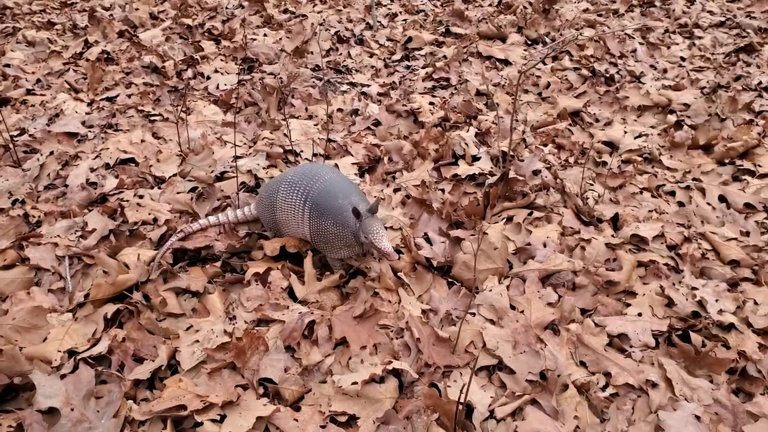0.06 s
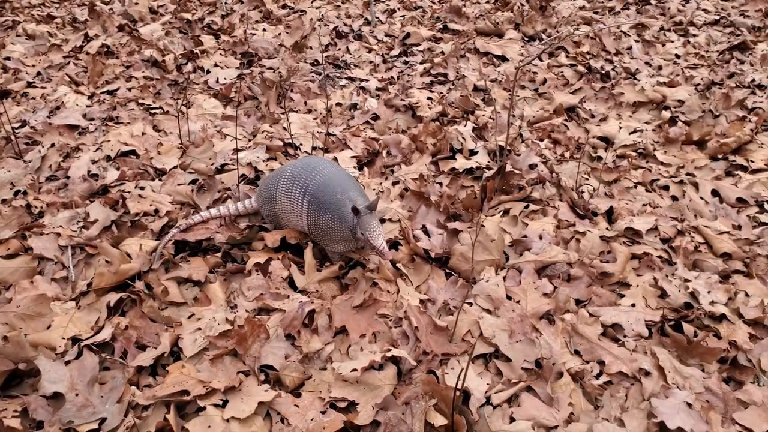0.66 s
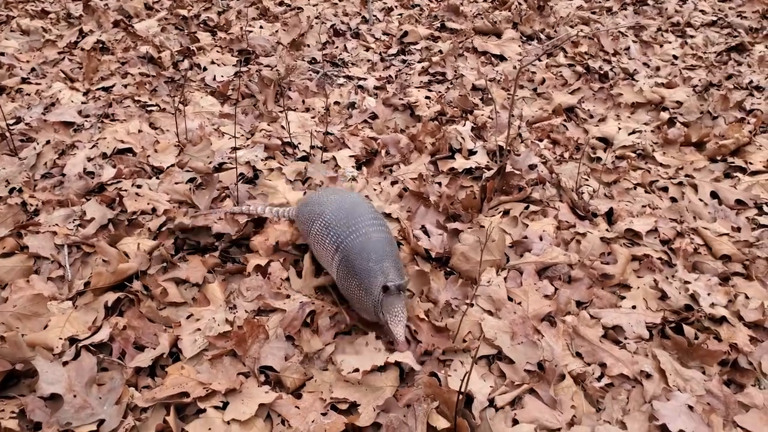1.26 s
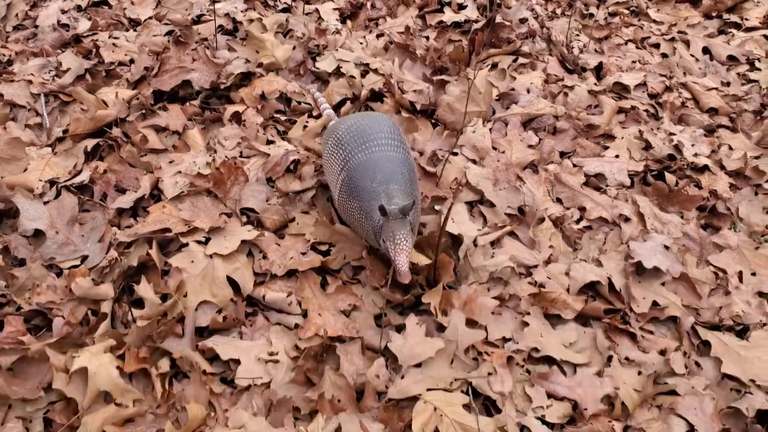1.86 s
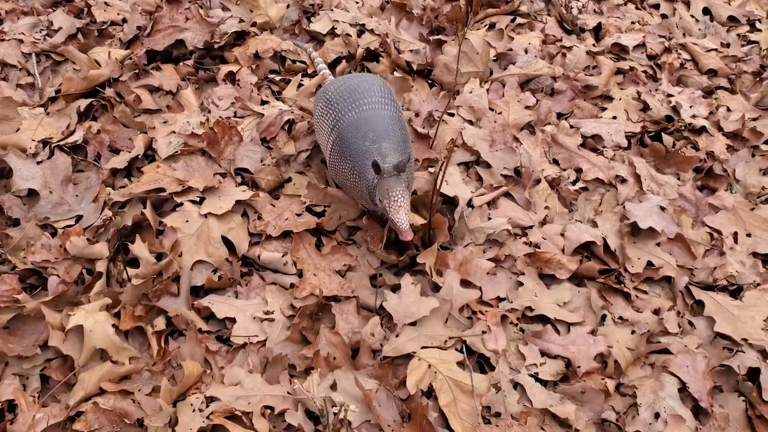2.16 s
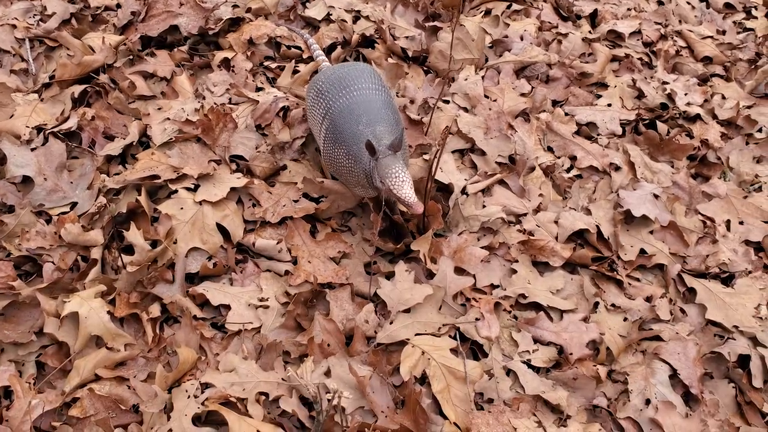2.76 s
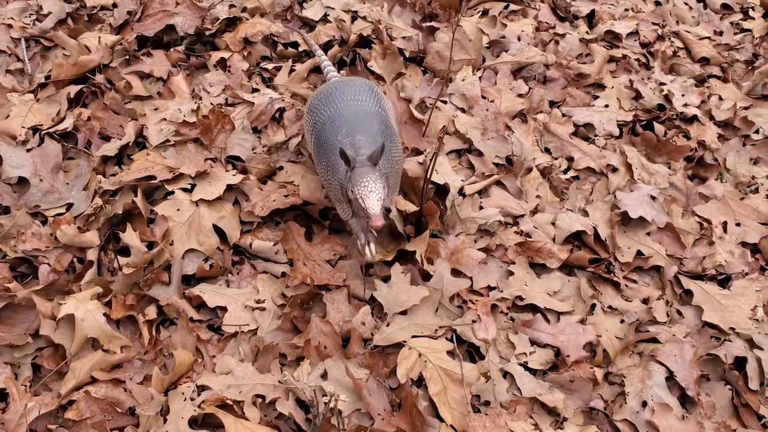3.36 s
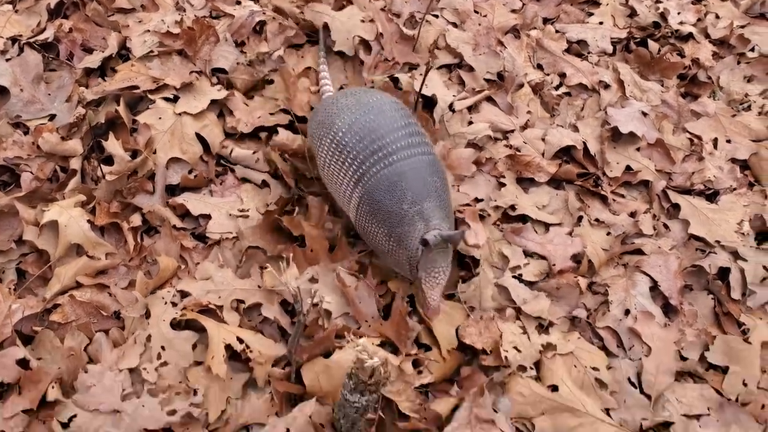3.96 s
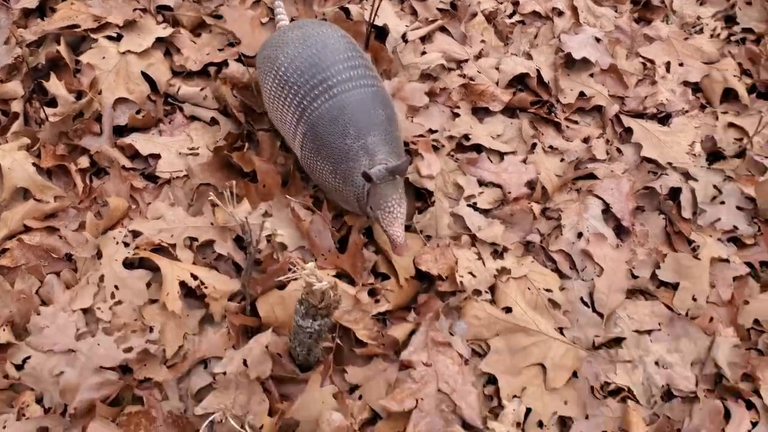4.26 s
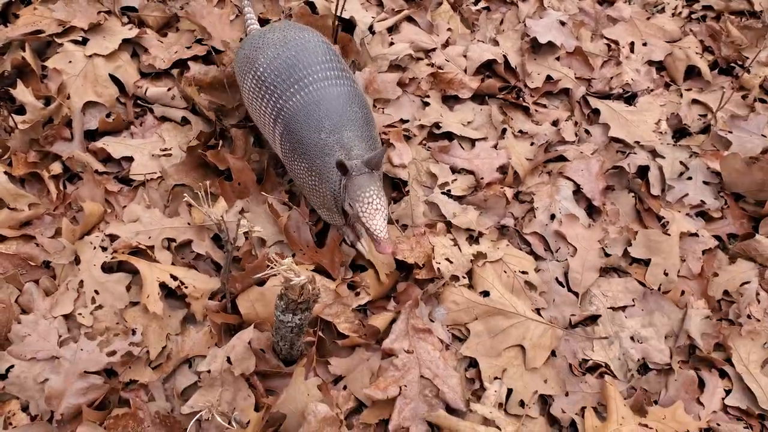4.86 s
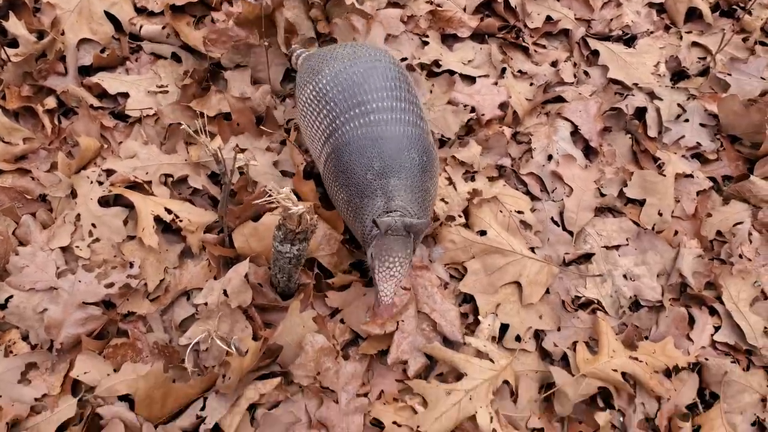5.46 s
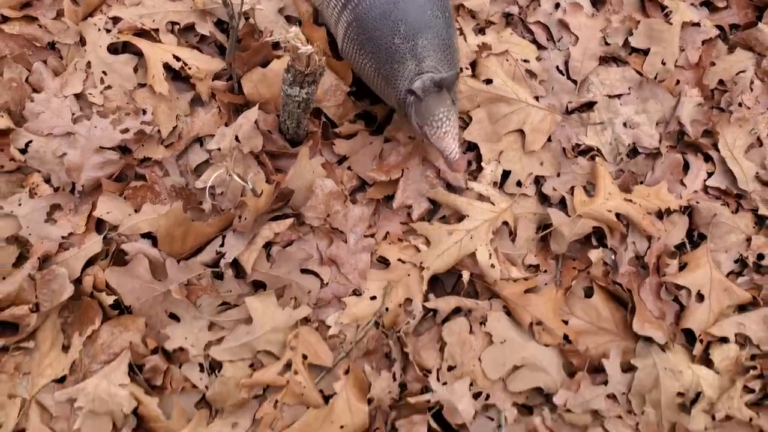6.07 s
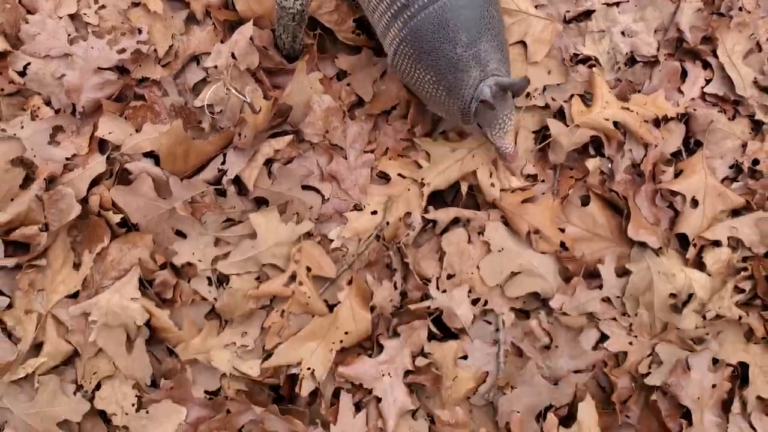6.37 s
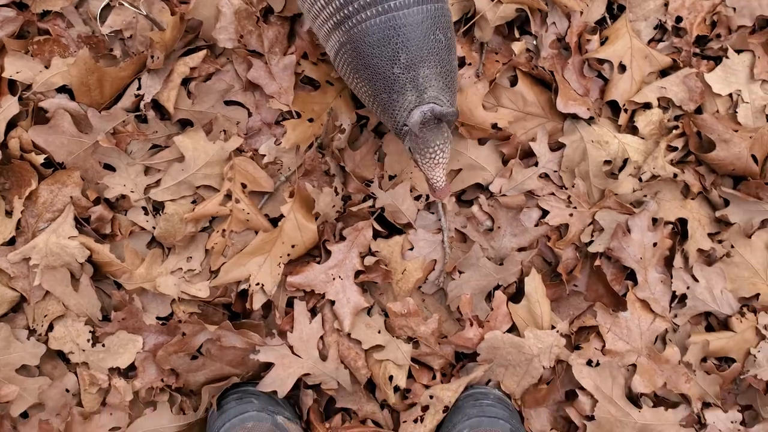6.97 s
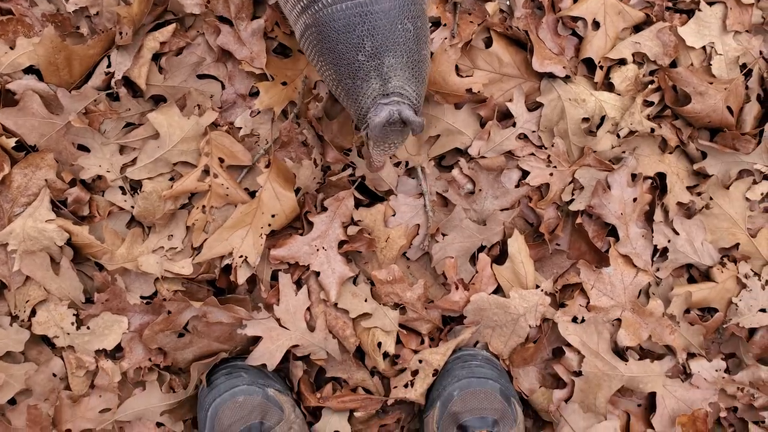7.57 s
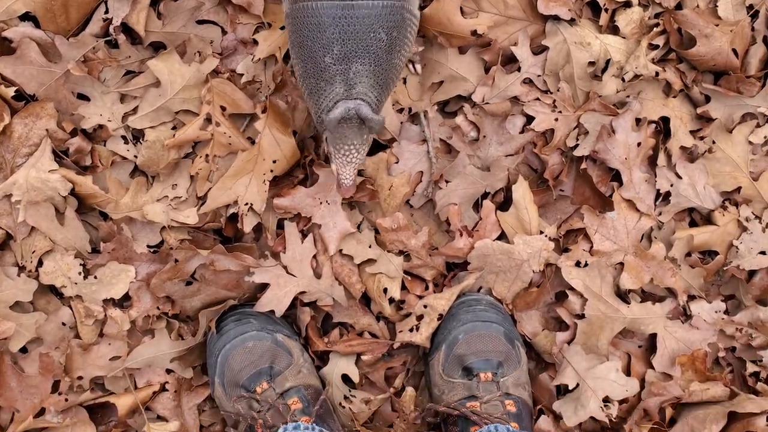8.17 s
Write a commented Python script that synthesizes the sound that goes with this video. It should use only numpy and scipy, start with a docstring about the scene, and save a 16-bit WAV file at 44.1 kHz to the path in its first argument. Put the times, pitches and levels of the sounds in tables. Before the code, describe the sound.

Dry leaves crunch and rustle in irregular bursts as a small animal pushes through them, with little snaps and a soft low rumble underneath.

```python
"""On the floor of an almost silent wood, an armadillo shoves through dry oak leaves to a hand-held phone.
Each shove excites a swarm of tiny brittle fractures over the friction hiss of sliding leaves, in bursts
with pauses between. Single leaves and stalks snap; knocked or scraped twigs resonate. The ground reflects
the leaf sound, which reaches two microphone ports. Underneath lie soft low thumps, a low, gusty rumble
of air on the microphone and two taps on the phone's body."""
import sys
import numpy as np
from scipy import signal
from scipy.fft import rfft, irfft, next_fast_len
from scipy.io import wavfile
from scipy.ndimage import uniform_filter1d

SR = 44100
rng = np.random.default_rng(int(sys.argv[2]) if len(sys.argv) > 2 else 0)


def unload_wav(signal):
    """Save mono or channel-first audio to the path in sys.argv[1] as 16-bit WAV at rate SR, clipped to [-1, 1]."""
    wavfile.write(
        sys.argv[1],
        SR,
        np.round(np.clip(np.atleast_2d(signal).T, -1, 1) * 32767).astype(np.int16),
    )


N = 362502
TIME = np.arange(N) / SR


# Steps and shoves of the snout: t/s at full force, hold/s, level/dB, release/s per 20 dB,
# relative weight level/dB, relative crunch level/dB
SHOVES = [(0.016, 0.036, -29.5, 0.13, -20, -6), (.195, .005, -29, 0.1832, -22, -6.5),
          (0.392, .06, -34, 0.06, -20, -4), (.488, .066, -25, 0.1259, -22, -6.5),
          (.66, .062, -37.5, .16, -21.5, -4), (0.888, 0.041, -42.5, 0.19, -20.5, -4.5),
          (1.092, .015, -47, 0.13, -14, -4.5), (1.246, 0.037, -60, 0.23, -4, -9),
          (1.509, .074, -37, 0.02, -18, -7.5), (1.602, .12, -32.5, 0.05, -24, -11.5),
          (1.757, 0.033, -27.5, 0.38, -20, -9), (1.957, .074, -26.5, 0.34, -20, -8),
          (2.213, 0.033, -33, .04, -23, -12), (2.277, .005, -25.5, 0.1822, -24.5, -10),
          (2.366, .103, -37, .07, -20.5, -7.5), (2.621, .05, -56, 0.09, -16.5, -7.5),
          (2.805, 0.0057, -62.5, 0.02, -13.5, -12), (3.046, 0.0065, -37.5, .127, -25.5, -10),
          (3.188, 0.0052, -51, .11, -16, -9.5), (3.362, 0.051, -58, 0.11, -17.5, -15),
          (3.487, 0.0082, -63, 0.1, -23, -17), (3.7, .056, -38.5, 0.27, -26.5, -8.5),
          (3.757, .005, -29, 0.0738, -27.5, -12.5), (3.811, 0.14, -34.5, 0.1, -21.5, -9.5),
          (4.031, .032, -22.5, .21, -23.5, -9), (4.186, 0.079, -25, 0.0265, -22.5, -12.5),
          (4.301, .048, -27.5, 0.1333, -20.5, -9), (4.402, 0.073, -33.5, 0.14, -21, -8),
          (4.534, 0.08, -44.5, .2, -16, -7), (4.76, .076, -50.5, 0.28, -18.5, -5.5),
          (5.262, .069, -40.5, 0.19, -18.5, -5.5), (5.37, .083, -31, 0.04, -23, -8),
          (5.503, 0.13, -27.5, 0.09, -17, -8), (5.687, 0.099, -31.5, 0.07, -23.5, -12.5),
          (5.844, 0.065, -35, 0.2, -16, -9), (6.026, .088, -38.5, .02, -22.5, -10),
          (6.187, 0.04, -54, 0.04, -22, -10.5), (6.27, .257, -58.5, .03, -14, -5),
          (6.602, 0.091, -34, .1, -19, -7.5), (6.739, 0.11, -28, 0.25, -19.5, -9),
          (6.956, 0.0091, -29.5, 0.38, -17, -8.5), (7.11, .062, -26.5, .18, -22, -7.5),
          (7.311, .033, -29.5, 0.06, -23, -8.5), (7.424, .127, -30.5, 0.0647, -22, -8),
          (7.554, 0.038, -33.5, 0.21, -20.5, -7.5), (7.765, .112, -55, 0.5, -18, -11),
          (8.155, .1, -39, .15, -18, -10)]

def shove_envelopes(attack_s=.074, attack_power=1.5, settle_db=-38.5, settle_s=.29, stir_db=-75.5):
    """Incoherent addition: shoves and a faint stir sum in power, giving rustle, weight and crunch gains."""
    power = undb(stir_db + np.array([[0], [-16], [-10]])) ** 2 * np.ones(N)
    t = np.arange(2 * SR) / SR - attack_s
    for s, hold_s, db, release_s, weight_db, crunch_db in SHOVES:
        attack = np.clip(1 + t / attack_s, 0, 1) ** attack_power
        after = np.maximum(t - hold_s, 0)
        release = 10 ** (-after / release_s)
        settling = undb(settle_db) * 10 ** (-after / settle_s)
        gains = undb(db + np.array([[0], [weight_db], [crunch_db]]))
        add(power, s - attack_s, (gains * attack * (release + settling)) ** 2)
    return np.sqrt(power)


def rustle(fractures_per_s=1700, crowding=.55, brightening=.046, slide_db=-4, yield_s=.11, catch_db=.6):
    """Fracture and sliding friction: a harder shove breaks more leaves a second and sounds brighter."""
    shove, weight_gain, crunch_gain = shove_envelopes()
    effort = shove / undb(-30)
    cracks = fractures(fractures_per_s * effort ** crowding)
    hiss = undb(slide_db) * rng.standard_normal((2, N))
    weight, crunch, middle, top = leaf_registers(shifting_resonances(cracks + hiss))
    # deep litter yields slowly, so the lows take only part of a sudden push
    pressed = np.sqrt(np.clip(uniform_filter1d(shove, int(yield_s * SR)) / shove, 0, 1))
    lows = pressed * (undb(-3) * weight_gain * weight + undb(-1) * crunch_gain * crunch)
    highs = shove * (undb(-.82) * middle + undb(-1.55) * effort ** brightening * top)
    stick_slip = undb(catch_db * slow_noise(hz=30))
    return (lows + highs) * stick_slip


def fractures(per_s, spread_db=4.5, largest_db=20, t60=.00813, leaves=32):
    """Poisson process: random impulses excite many leaves; most are tiny, a few stand out."""
    out = np.zeros((2, N))
    for _ in range(leaves):
        at = np.flatnonzero(rng.random(N) < per_s / leaves / SR)
        size_db = np.minimum(spread_db * rng.exponential(size=len(at)), largest_db)
        kicks = np.zeros(N)
        # dividing by the root of the rate keeps the mean power steady
        kicks[at] = undb(size_db) * rng.choice([-1, 1], len(at)) / np.sqrt(per_s[at])
        ring = leaf_ring(t60 * 2 ** rng.uniform(-1.1, 1), litter_db=-13.5)
        out += signal.oaconvolve(kicks[None], ring, axes=1)[:, :N]
    return unit(out)


def leaf_ring(t60, litter_db, litter_t60=.098, uneven_db=3.5, tear_s=.000224, size=4096):
    """Impulse response: a torn leaf rings at its own resonances; scattering in the litter adds a tail."""
    t = np.arange(size) / SR
    tear = 1 - np.exp(-t / tear_s)
    decay = undb(-60 * t / t60) + undb(litter_db - 60 * t / litter_t60)
    resonances = np.column_stack([np.geomspace(300, 16000, 30), uneven_db * rng.standard_normal(30)])
    ring = colour(rng.standard_normal((2, size)) * tear * decay, resonances)
    return ring / np.sqrt(np.sum(ring ** 2, axis=1, keepdims=True) / 2)


def shifting_resonances(x, depth_db=1.5, size=768, smooth_cells=5):
    """Spectral modulation: as new leaves are pressed, resonances come and go in tens of milliseconds."""
    cells = signal.stft(x, nperseg=size)[2]
    drift = rng.standard_normal(cells.shape[1:])
    for axis in (0, 1, 0, 1):
        drift = uniform_filter1d(drift, smooth_cells, axis=axis)
    return signal.istft(cells * undb(depth_db * unit(drift)), nperseg=size)[1][:, :N]


# Spectrum of dry leaves, before each register is normalised: f/Hz, level/dB
LEAF_SPECTRUM = [(110, -7.5), (200, -7.5), (450, -3), (900, -4), (1400, -0.5), (2150, -2.5), (3000, -1.5),
                 (3800, -0.85), (5200, -3), (6800, -3), (7500, -10.5), (8500, -8), (11500, 0.5), (13300, 1),
                 (15800, -4.5)]

def leaf_registers(x, crossovers_hz=(400, 1950, 7800)):
    """Band splitting: leaf sound divides into weight, crunch, middle and top, each at rms 1."""
    rest, parts = colour(x, LEAF_SPECTRUM), []
    for hz in crossovers_hz:
        parts.append(unit(band(rest, hz, "low")))
        rest = band(rest, hz, "high")
    return parts + [unit(rest)]


# Single leaves and stalks breaking: t/s, level/dB before gain, relative body level/dB, top level/dB
SNAPS = [(0.1094, -30, -11, 3), (0.1816, -32, -4.5, 7), (0.1916, -25, -3.5, -3), (0.3363, -36, 1, 0),
         (0.3663, -31.5, -6, 1), (0.7606, -39, -6.5, 0), (0.9165, -39, 0.5, 5), (0.932, -38.5, -3, -4),
         (0.9653, -50, -8.5, 17), (0.9918, -35.5, -7, -8), (1.1783, -45.5, -8, -7.5),
         (1.2687, -48, -28, 6.5), (1.345, -64, -21, 7), (1.3766, -66, -21, 14), (1.4584, -49.5, -7, 15),
         (1.5085, -34, -3, 11.5), (1.572, -37, -12, 8), (2.005, -23.5, -7.5, -9), (2.271, -22, -20, -8),
         (2.2737, -23, -7, 4.5), (2.4519, -33.5, -15, -2), (2.6177, -43.5, -20.5, 2),
         (2.671, -48.5, -21.5, -1), (2.708, -54, -14, -4), (3.0447, -34.5, -9.5, 2),
         (3.115, -37.5, -23, -6), (3.192, -36, -15, -6), (3.276, -47.5, -32.5, -1), (3.381, -55.5, -17, 4),
         (3.4061, -42.5, -23, -1), (3.41, -41.5, -24.5, 2), (3.6566, -42.5, -23.5, 3.5),
         (3.8143, -25, -25, -11), (4.2028, -19, -25, -20.5), (4.2156, -22, -10.5, -1),
         (4.4559, -25.5, -24, -4), (4.508, -45, -16.5, 9), (4.565, -41, -9.5, 6), (4.7711, -52.5, -20, 3),
         (4.8702, -38.5, -3, -4), (4.9879, -54.5, -15.5, -10), (5.2814, -45, -1, 15),
         (5.3694, -29, -7.5, 9), (5.496, -30.5, 3, -1), (5.691, -27.5, -11.5, 1), (5.731, -29, -17.5, -3),
         (5.88, -31, -7.5, -11), (5.9444, -33, -15, 3), (5.9511, -26, -9, 2), (5.983, -29, -13.5, 3.5),
         (6.0213, -34, -14, 4), (6.096, -36, -9, 9), (6.6119, -38, -21, 12), (7.116, -30.5, -13, -1),
         (7.168, -26, -7.5, -6), (7.236, -38, -2.5, -3), (7.456, -27.5, -12.5, -7.5),
         (7.5549, -34, -18, -3), (7.6462, -22.5, -5.5, -9), (7.7098, -32, -8.5, 4.5),
         (7.727, -36, -25, -11), (7.7633, -51, 7.5, 4), (7.8565, -47.5, -3, 6), (8.018, -53.5, -11, -2),
         (8.2152, -27, -7, 1)]

def snaps(gain_db=-13, body_db=-2, thud_db=-11, top_db=1):
    """Free vibration: each break rings once, deeper for a stalk and brighter for a thin edge."""
    out = np.zeros((2, N))
    for s, db, deep_db, crisp_db in SNAPS:
        weight, crunch, middle, top = leaf_registers(leaf_ring(t60=.013, litter_db=-32.5, uneven_db=4.5))
        body = undb(deep_db + body_db) * (crunch + undb(thud_db) * weight)
        add(out, s, undb(db + gain_db) * (body + middle + undb(crisp_db + top_db) * top))
    return out


# Knocked or scraped twigs: t/s, duration/s, start f/Hz, end f/Hz, level/dB
TWIG_TONES = [(1.506, 0.009, 500, 477, -40), (6.729, 0.0685, 749, 857, -45.5),
              (6.823, 0.0615, 922.4, 950.5, -44.5), (6.887, 0.155, 310.7, 384, -47.5),
              (7.112, 0.081, 1019, 1112, -46), (7.511, 0.01075, 430.7, 400.8, -38)]

def twigs(friction_hz=45, flutter_db=2.3, jitter_rad=.83):
    """Forced vibration: friction drives a resonance unevenly; it glides as the point of contact moves."""
    out = np.zeros((2, N))
    for s, length, start_hz, end_hz, db in TWIG_TONES:
        n = int(length * SR)
        drive = slow_noise(friction_hz, SR)[-n:]
        phase = 2 * np.pi * np.cumsum(np.linspace(start_hz, end_hz, n)) / SR
        envelope = signal.windows.tukey(n, .6) * undb(flutter_db * drive)
        add(out, s, undb(db) * unit(envelope * np.sin(phase + jitter_rad * drive)))
    return out


# The animal's path as heard: t/s, treble left minus right/dB, reflection delay/s, reflection level/dB
ANIMAL_PATH = [(0, 4, .0003, -14), (.8, 4, .0003, -14), (1.7, .5, .00028, -9), (4.2, 0, .00027, -9),
               (5.7, -.5, .00027, -9), (6.9, .5, .00031, -6), (7.5, .5, .0003, -7), (8, 1.5, .00023, -7)]

def ground_reflection(x, dull_hz=4800):
    """Comb filtering: the ground's dull echo hollows the middle and lifts the papery band above it."""
    _, lag_s, echo_db = curves(ANIMAL_PATH)
    dull = signal.sosfiltfilt(signal.butter(2, dull_hz, fs=SR, output="sos"), x)
    echo = np.array([np.interp(TIME - lag_s, TIME, side) for side in dull])
    return x + undb(echo_db) * echo


# Level difference of the microphone ports: f/Hz, left minus right/dB
PORT_BALANCE = [(300, 0.16), (1300, -.5), (1800, 5.96), (2200, 0.26), (4800, 0), (5800, 4.9), (6900, 6),
                (7500, -1), (8400, 6.9), (9700, 0.14), (11500, -2), (13200, 6.98), (14600, -2)]
# Likeness of the two ports: f/Hz, coherence (0-1)
PORT_COHERENCE = [(200, 0.95), (500, 0.937), (1200, 0.924), (1800, 0.19), (2800, 0.62), (3600, 0.24),
                  (5000, 0.4), (6500, 0.057)]
# Phase lead of the left port: f/Hz, phase/rad
PORT_LEAD = [(100, -0.5), (800, 0.33), (1400, 1.14), (1750, 1), (2050, 0), (3000, 1.54), (3600, 3.5),
             (4200, 1.59), (5200, 2), (7000, 6)]

def microphone_ports(x, shadow_hz=2200):
    """Partial coherence: two ports hear nearly the same lows but unlike, differently coloured highs."""
    size = next_fast_len(N + 4096)
    hz = np.arange(size // 2 + 1) * SR / size
    left, other = rfft(x, size)
    coherence = np.clip(across(PORT_COHERENCE, hz), 0, 1)
    shared = coherence * left * np.exp(-1j * across(PORT_LEAD, hz))
    right = shared + np.sqrt(1 - coherence ** 2) * other
    lean = undb(across(PORT_BALANCE, hz))
    pair = irfft(np.array([left * lean, right]) * np.sqrt(2 / (1 + lean ** 2)), size)[:, :N]
    # the phone's body casts an acoustic shadow only in the treble
    shadow = pan(curves(ANIMAL_PATH)[0])
    return band(pair, shadow_hz, "low") + band(pair, shadow_hz, "high") * shadow


# Soft low blows: t/s, level/dB before gain, f/Hz, left minus right/dB
THUMPS = [(0.154, -35, 66.3, -21), (0.871, -33, 62.6, -13), (0.93, -36.5, 64.4, -10),
          (1.085, -34.5, 63.35, 19), (1.217, -28.5, 97.7, 26.5), (1.279, -30.5, 62.76, 23),
          (1.407, -35, 98.6, 24), (1.43, -29.5, 66.96, 23), (1.47, -33, 69, 22.5), (1.553, -36, 76, 17.5),
          (2.197, -30.5, 72.17, 10.5), (2.33, -28, 64.1, 9), (2.582, -40, 56, 15), (3.16, -36, 61.3, 13),
          (3.238, -31, 83.7, -25), (3.315, -32.5, 60.8, -26), (4.115, -34.5, 62.7, 10),
          (4.169, -32.5, 73.5, 11.5), (4.618, -34.5, 74.9, 10), (4.995, -32.5, 73.9, -22),
          (5.151, -32.5, 65.6, 16), (5.326, -31.5, 76, 16)]

def thumps(swell_cycles=.396, gain_db=.5, quadrature_db=-4):
    """Damped oscillation: a blow swells and dies in two or three cycles, with a phase for each port."""
    out = np.zeros((2, N))
    for s, db, hz, pan_db in THUMPS:
        cycles = hz * np.arange(SR // 5) / SR
        swell = (cycles / swell_cycles / 2) ** 2 * np.exp(2 - cycles / swell_cycles)
        quadrature = undb(quadrature_db) * rng.choice([-1, 1]) * np.cos(2 * np.pi * cycles)
        wave = np.sin(2 * np.pi * cycles) + np.array([quadrature, -quadrature])
        lean = pan(pan_db)
        add(out, s, undb(db + gain_db) * lean / lean.mean() * swell * wave)
    return out


# Taps on the phone: t/s, peak level/dB before gain
TAPS = [(6.3377, -22.5), (6.4077, -25)]
# Response of the phone's body to a tap: f/Hz, level/dB
TAP_SPECTRUM = [(40, -8.5), (150, -5), (350, 1), (700, -4), (1400, -13.5), (3000, -24), (5000, -15),
                (8000, -38), (15000, -26.5)]

def taps(gain_db=-.5):
    """Structure-borne sound: two impulses pass through the phone's body."""
    out = np.zeros((2, N))
    tap = colour(signal.unit_impulse(SR // 20)[None], TAP_SPECTRUM)
    for s, db in TAPS:
        add(out, s, undb(db + gain_db) * tap / np.abs(tap).max())
    return out


# Puffs of air: centre t/s, duration/s, level/dB before gain, left minus right/dB
RUMBLE_SWELLS = [(.62, 0.32, -53, -12.5), (.97, 0.21, -43, -7), (1.341, 0.46, -41, 23),
                 (2.3, 0.33, -40.5, 4), (2.72, 0.217, -40, 0.5), (3.269, 0.2055, -41, -10),
                 (4.13, .25, -38.5, 6), (4.721, 0.29, -37.5, -4.5), (5.12, 0.43, -41, 1),
                 (5.6, 0.31, -51, -4), (6.75, .22, -44.5, 5.5), (7.25, .35, -49.5, -13),
                 (7.85, .17, -49, -7), (8.17, .15, -52, 0)]
# Spectrum of the low rumble: f/Hz, level/dB
RUMBLE_SPECTRUM = [(15, -38), (30, -17.5), (50, -8.5), (65, -4), (100, -9.5), (150, -23), (250, -32),
                   (600, -75)]

def low_rumble(floor_db=-55.5, gain_db=-2, uneven_db=2):
    """Wind noise: low rumble swells and fades, often on one side, as air buffets the microphone ports."""
    flutter = undb(uneven_db * slow_noise(hz=9))
    rumble = unit(flutter * colour(rng.standard_normal((2, N)), RUMBLE_SPECTRUM))
    power = undb(floor_db) ** 2
    for s, length, db, pan_db in RUMBLE_SWELLS:
        swell = np.exp(-(2 * (TIME - s) / length) ** 2)
        power = power + (undb(db) * unit(pan(pan_db))) ** 2 * swell
    return rumble * undb(gain_db) * np.sqrt(power)


# Spectrum of the quiet wood: f/Hz, level/dB
AIR_SPECTRUM = [(30, -1), (120, -3), (300, -20), (1400, -30.5), (4000, -30), (8000, -35.5), (13000, -32),
                (16000, -38)]

def still_air(db=-75):
    """Ambient noise floor: the faint, steady hush of the wood."""
    return undb(db) * unit(colour(rng.standard_normal((2, N)), AIR_SPECTRUM))


def undb(db):
    """Amplitude ratio of a level in decibels."""
    return 10 ** (np.asarray(db) / 20)


def unit(x):
    """Normalisation to rms 1."""
    return x / np.sqrt(np.mean(x ** 2))


def pan(db):
    """Level difference shared equally between a left and a right gain."""
    return undb(np.vstack([db, -db]) / 2)


def slow_noise(hz, n=N):
    """Random modulation: low-passed noise at rms 1."""
    return unit(band(rng.standard_normal(n), hz, "low"))


def curves(table):
    """Linear interpolation of a time table's columns, one value per sample."""
    s, *columns = np.transpose(table)
    return [np.interp(TIME, s, c) for c in columns]


def across(points, hz):
    """Interpolation of (f/Hz, value) points on a log-frequency axis."""
    f, value = np.transpose(points)
    return np.interp(np.log(hz + 1), np.log(f), value)


def colour(x, points, size=8192):
    """Minimum-phase filter through (f/Hz, level/dB) points, made causal by folding the cepstrum."""
    hz = np.arange(size // 2 + 1) * SR / size
    cepstrum = irfft(np.log(undb(across(points, hz))))
    cepstrum[1:size // 2] *= 2
    cepstrum[size // 2 + 1:] = 0
    response = irfft(np.exp(rfft(cepstrum)))
    return signal.fftconvolve(x, response[None], axes=1)[:, :x.shape[1]]


def band(x, edge_hz, kind):
    """Crossover filter: the low and high bands add up flat."""
    sos = signal.butter(2, edge_hz, kind, fs=SR, output="sos")
    return signal.sosfilt(sos, signal.sosfilt(sos, x))


def add(track, s, sound):
    """Superposition of a sound on a track at time s."""
    start = int(s * SR)
    sound, start = sound[..., max(-start, 0):], max(start, 0)
    track[:, start:start + sound.shape[-1]] += sound[..., :max(N - start, 0)]


def scene():
    """Superposition: leaves and twigs in front of the phone, low noises on it, quiet air around."""
    airborne = ground_reflection(rustle() + snaps()) + twigs()
    return microphone_ports(airborne) + thumps() + taps() + low_rumble() + still_air()


def record(dry, top_hz=15800):
    """Band limiting: the phone cuts the top with a steep low-pass filter."""
    return signal.sosfilt(signal.ellip(10, .2, 70, top_hz, fs=SR, output="sos"), dry)


dry = scene()
out = record(dry)
unload_wav(out)
```